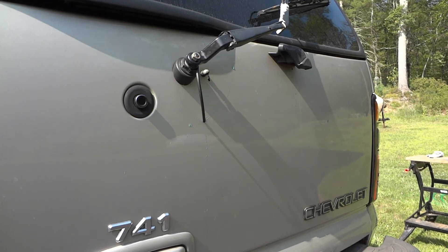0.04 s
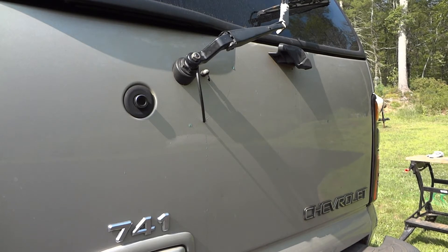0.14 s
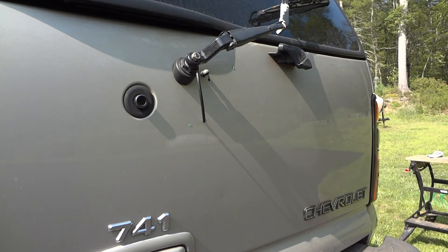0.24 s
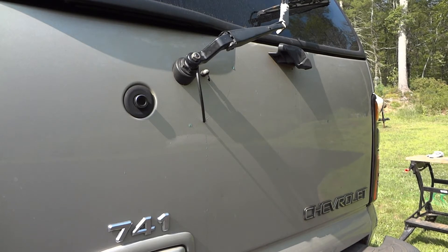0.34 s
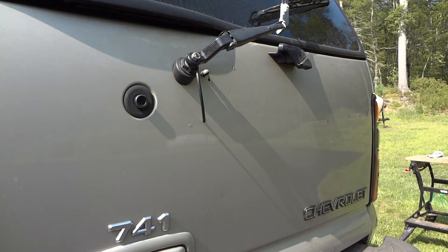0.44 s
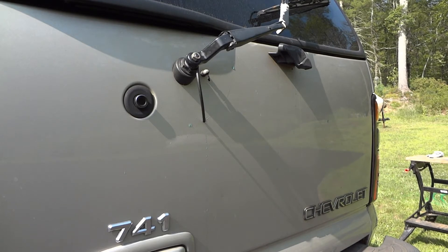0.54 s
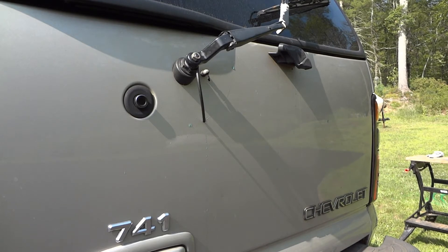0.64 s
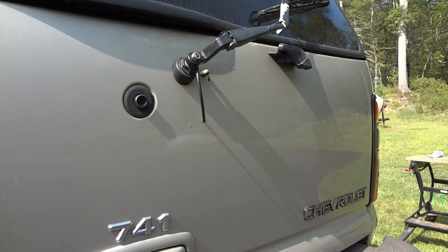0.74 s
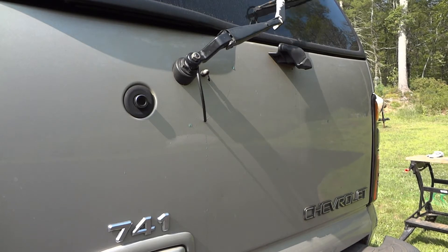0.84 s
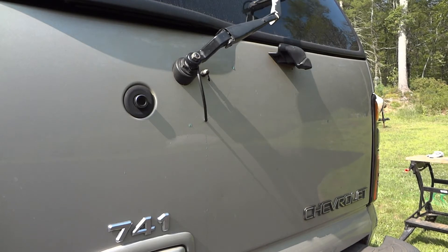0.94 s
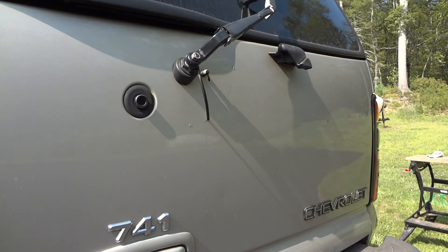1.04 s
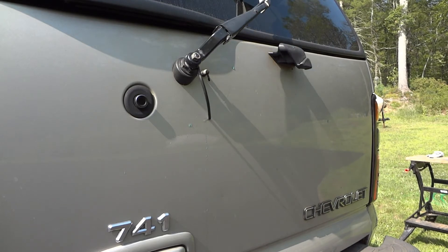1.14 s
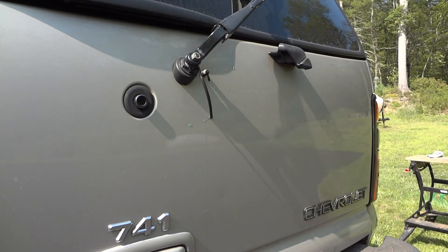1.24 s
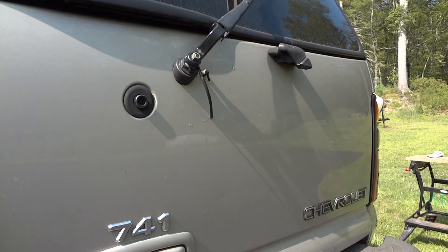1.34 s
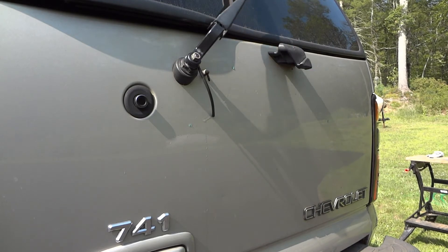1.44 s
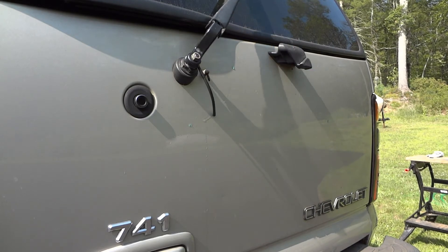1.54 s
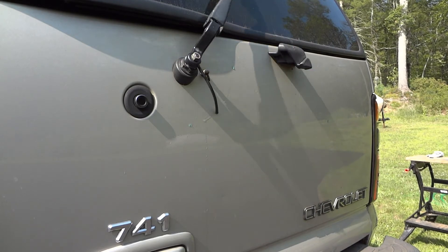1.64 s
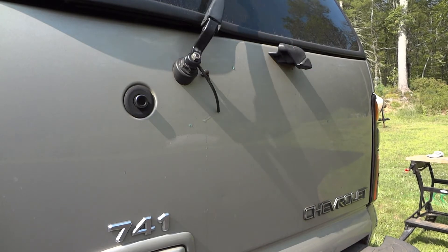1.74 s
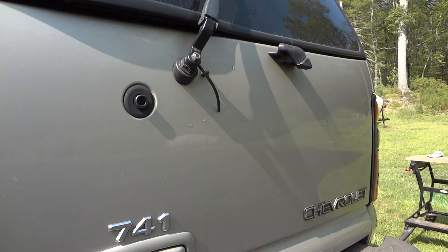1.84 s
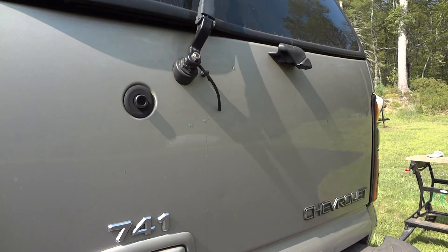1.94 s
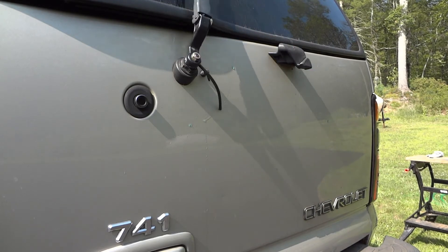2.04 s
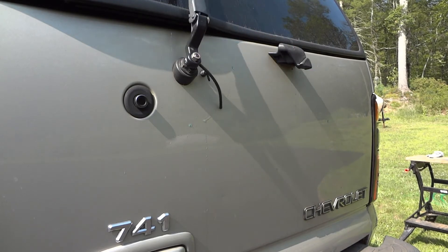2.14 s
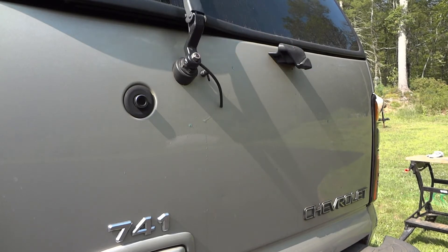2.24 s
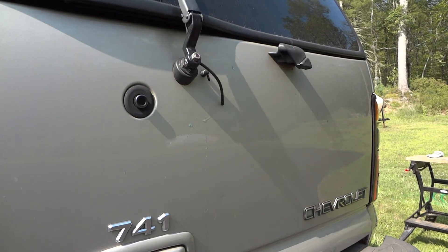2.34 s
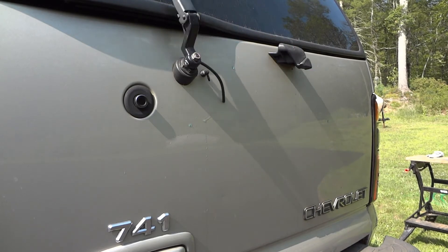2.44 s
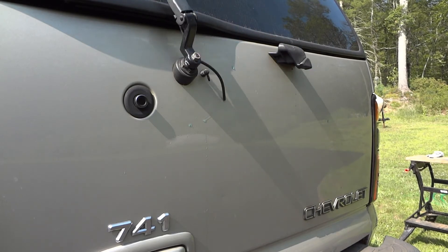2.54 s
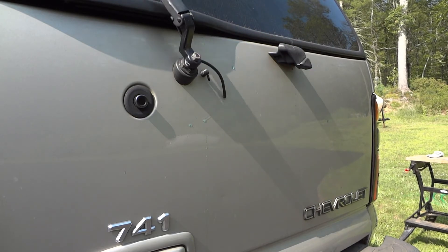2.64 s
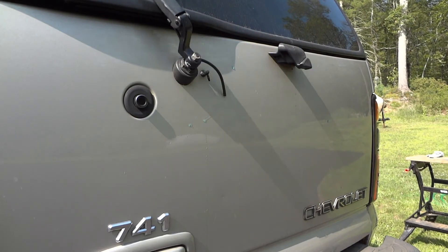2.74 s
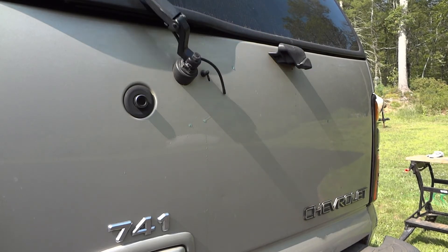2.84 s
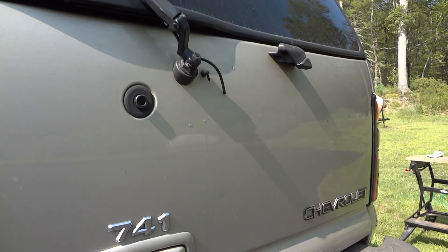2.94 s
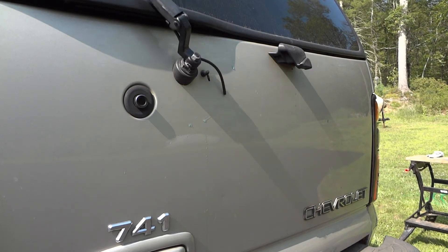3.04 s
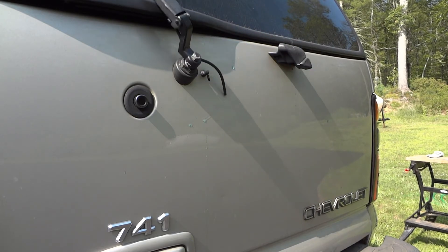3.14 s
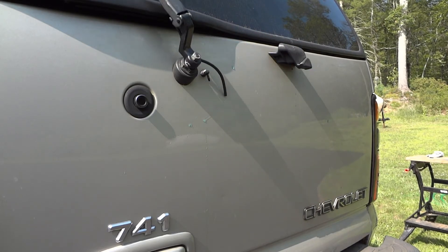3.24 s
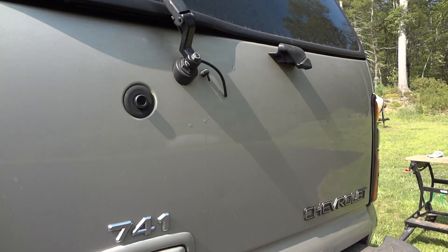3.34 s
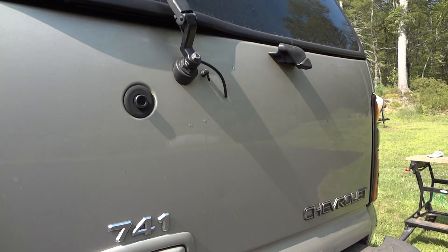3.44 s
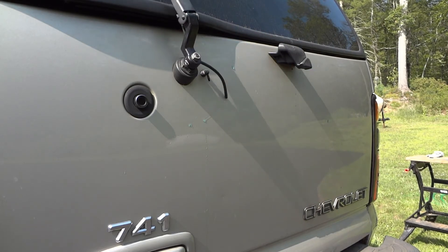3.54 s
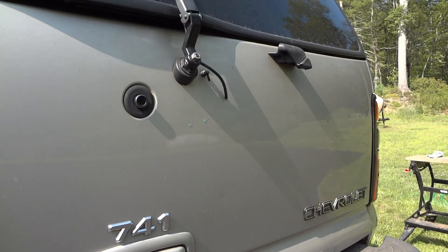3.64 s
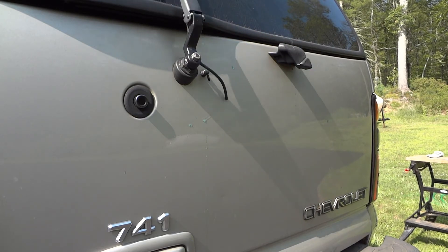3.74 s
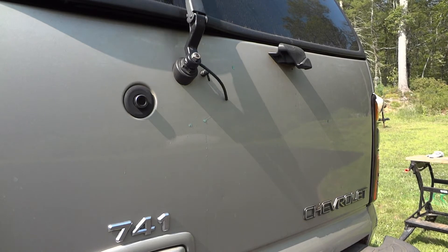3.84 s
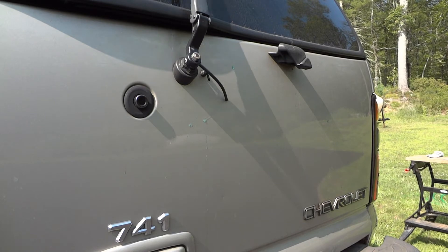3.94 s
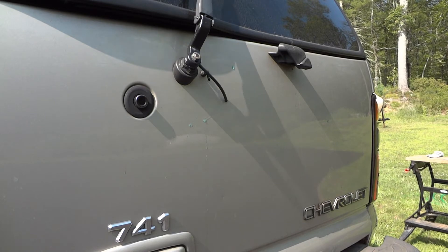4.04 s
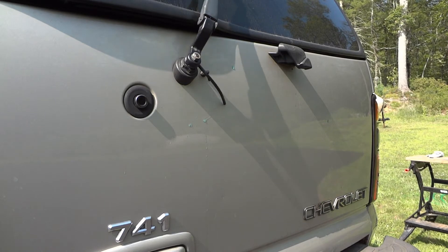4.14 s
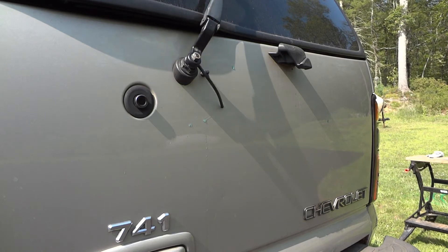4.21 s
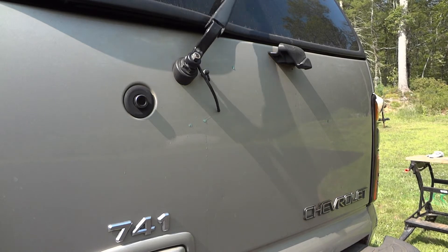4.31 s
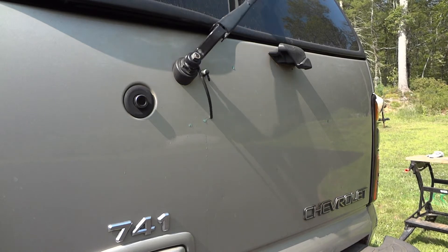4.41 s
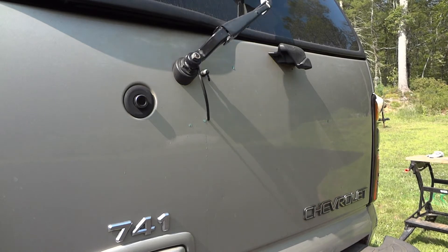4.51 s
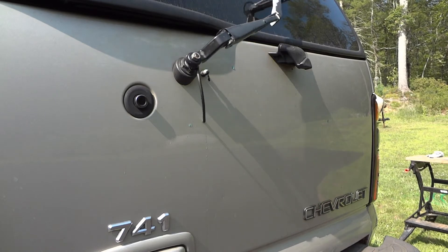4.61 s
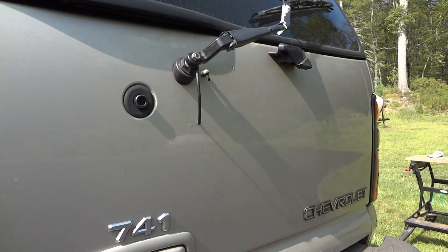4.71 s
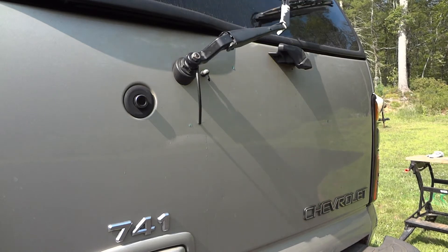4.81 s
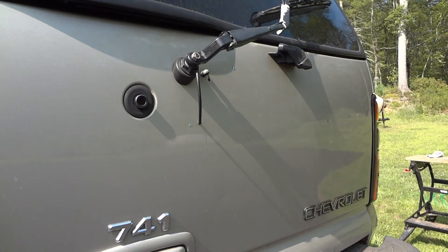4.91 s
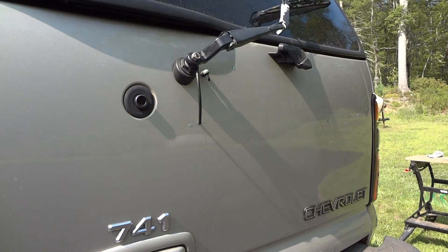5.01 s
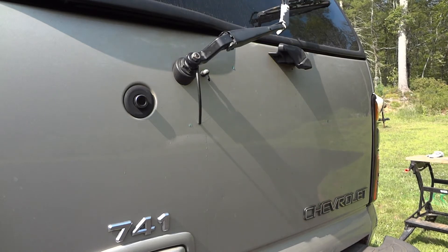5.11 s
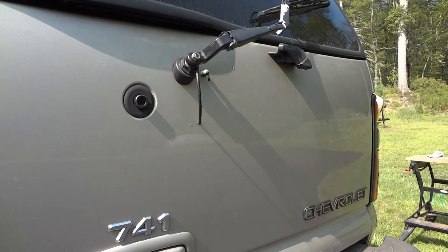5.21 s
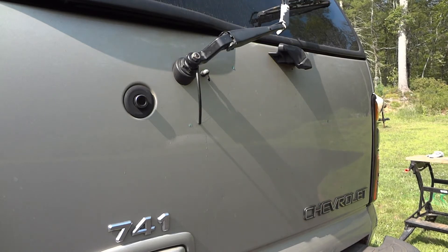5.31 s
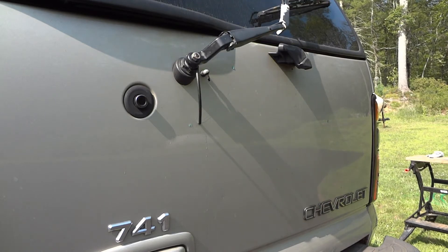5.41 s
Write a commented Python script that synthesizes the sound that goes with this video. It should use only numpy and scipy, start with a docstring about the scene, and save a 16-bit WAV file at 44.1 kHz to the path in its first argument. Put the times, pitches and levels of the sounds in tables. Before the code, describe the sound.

A single dry wiper stroke, miked close outdoors with faint microphone hiss. Quiet crickets and a thin, very high whistle come first; then bright rubber hiss builds, peaks and judders as the blade turns over, slightly to the left. The return stroke hisses softer, ending in a thin squeal, a bright snap, swelling motor hum, a pulsing whine and several clicks at rest.

```python
"""The rear wiper of a parked vehicle sweeps out and back once, on a lawn in summer.
A crank swings the arm; the rubber blade hisses over dry glass and stutters as it flips and as it parks.
The motor hums through the tailgate under load, the drive whines near the stop, and the linkage creaks,
shudders and clicks. These are tones, coloured noise and short ringing modes shaped by the arm's travel.
Crickets chirp and trill in the grass, with a faint drone and thin high whistles in the open air."""
import sys
import numpy as np
from scipy import signal
from scipy.fft import rfft, irfft, next_fast_len
from scipy.io import wavfile
from scipy.ndimage import map_coordinates

SR = 44100
rng = np.random.default_rng(int(sys.argv[2]) if len(sys.argv) > 2 else 0)


def store_pcm(level_fs):
    """Save levels as 16-bit WAV."""
    pcm = np.round(np.clip(level_fs, -1, 1) * 32767).astype(np.int16)
    wavfile.write(sys.argv[1], SR, np.atleast_2d(pcm).T)


N = 241055
TIME = np.arange(N) / SR
CUTOFF_HZ = 15880  # top of the sound


def from_db(db):
    """Decibels to gain."""
    return 10 ** (np.asarray(db) / 20)


def rms_one(x):
    """Scale to unit power."""
    return x / np.sqrt(np.mean(x ** 2) + 1e-20)


def in_time(rows):
    """Each column of a curve, read at every sample."""
    known_s, *columns = np.transpose(rows)
    return [np.interp(TIME, known_s, column) for column in columns]


def at_hz(points, hz):
    """Read a table on a log-frequency axis."""
    known_hz, values = np.transpose(points)
    return np.interp(np.log(hz + 1), np.log(known_hz), values)


def drift(rate_hz):
    """Slow random wander with spread 1: noise through two equal low-pass poles, at every 20th sample."""
    pole = np.exp(-40 * np.pi * rate_hz / SR)
    steps = rng.standard_normal(N // 20 + 4002)
    slow = signal.lfilter([1], [1, -2 * pole, pole * pole], steps)[4000:]  # drop the filter's start
    return np.interp(np.arange(N) / 20, np.arange(len(slow)), rms_one(slow))


def sine(hz):
    """A tone of rms 1 that follows a pitch curve from a random phase."""
    cycles = np.cumsum(hz * np.ones(N)) / SR
    return np.sqrt(2) * np.sin(2 * np.pi * (cycles + rng.random()))


def blurred_note(pitch_hz, width_hz):
    """Two neighbouring tones with randomly wandering strengths smear a note into a narrow band."""
    lower = drift(width_hz) * sine(pitch_hz)
    upper = drift(width_hz) * sine(pitch_hz + width_hz / 2)
    return lower + upper


def panned(x, pan_db):
    """Place a sound by its left minus right level."""
    return x * from_db(np.array([[.5], [-.5]]) * pan_db)


def noise(spectrum, likeness):
    """Stereo noise of a given colour and left-right likeness; rms 1."""
    size = next_fast_len(N)
    hz = np.arange(size // 2 + 1) * SR / size
    mid, side = rfft(rng.standard_normal((2, size)))
    alike = np.clip(at_hz(likeness, hz), -1, 1)
    both = np.sqrt(1 + alike) * mid + np.sqrt(1 - alike) * side * [[1], [-1]]
    # beyond the table's ends the colour falls away softly
    low_skirt = 1 + (spectrum[0][0] / (hz + 1)) ** 4
    high_skirt = 1 + (hz / spectrum[-1][0] / 2) ** 4
    skirts = 1 / np.sqrt(low_skirt * high_skirt)
    coloured = both * from_db(at_hz(spectrum, hz)) * skirts * (hz < CUTOFF_HZ)
    return rms_one(irfft(coloured, size)[:, :N])


def swells(rows):
    """Envelope of bell-shaped bursts from rows of centre_s, half_length_s, level_db; powers add."""
    power = 0
    for centre_s, half_s, level_db in rows:
        bell = np.exp(-np.minimum(((TIME - centre_s) / half_s) ** 2, 100))
        power = power + from_db(level_db) ** 2 * bell
    return np.sqrt(power)


def during(start_s, end_s, fade_s):
    """1 from start to end, fading outside."""
    return np.clip(1 + np.minimum(TIME - start_s, end_s - TIME) / fade_s, 0, 1)


def moving_resonance(x, centre_hz, width_hz, size=256):
    """A resonance of gain 1 whose centre glides, updated block by block."""
    radius = np.exp(-np.pi * width_hz / SR)
    zeros = np.array([1, 0, -1]) * (1 - radius * radius) / 2
    out, state = np.zeros_like(x), np.zeros((2, 2))
    for i in range(0, N, size):
        poles = [1, -2 * radius * np.cos(2 * np.pi * centre_hz[i] / SR), radius * radius]
        out[:, i:i + size], state = signal.lfilter(zeros, poles, x[:, i:i + size], zi=state)
    return out


# colour of the open air: pitch_hz, relative_db_per_hz
AIR = [(25, -13), (60, -11.5), (130, -4.5), (260, -1), (500, -2), (1000, -1.5), (2000, -7), (3500, -14),
       (6000, -17.5), (7900, -21), (9000, -24)]
# left-right likeness of the open air: pitch_hz, correlation
AIR_LIKENESS = [(60, 0.77), (130, 0.96), (290, 0.53), (640, -0.36), (1410, -0.39), (3100, -0.35),
                (6820, 0.28)]


def outdoors(air_db=-50.0, breeze_db=1.0):
    """Soft, wide open-air noise whose level drifts slowly."""
    return from_db(air_db + breeze_db * drift(1.2)) * noise(AIR, AIR_LIKENESS)


# thin whistles: pitch_hz, rms_db, waver_hz
THIN_TONES = [(12225, -72, 45), (13485, -61, 2)]


def thin_whistles():
    """Steady tones far up in the treble, each wavering slightly in pitch."""
    return sum(from_db(db) * sine(hz + waver_hz * drift(58)) for hz, db, waver_hz in THIN_TONES)


def trilling_cricket(pitch_hz, per_s, level_db, width_hz):
    """A farther insect beats its wings without pause; the grass blurs its note into a narrow band."""
    beat = np.cumsum(per_s * (1 + .03 * drift(4))) / SR % 1
    note = sine(pitch_hz) + blurred_note(pitch_hz, width_hz) / 2
    return from_db(level_db) * rms_one(np.sin(np.pi * beat) ** 2 * note)


# the low drone comes and goes in the distance: centre_s, half_length_s, level_db
DRONES = [(.08, 0.075, -57), (3.55, 0.22, -65.5)]


def drone(pitch_hz=240, unsteady=0.021):
    """A faint low note, wavering in pitch, that swells and fades."""
    return swells(DRONES) * sine(pitch_hz * (1 + unsteady * drift(36)))


# the arm's joints creak: start_s, level_db, ringing_hz
CREAKS = [(.15, -53, 650), (.87, -54, 510), (1.605, -50, 1200), (2.468, -44.5, 1430)]


def creaks(attack_s=0.0059, rasp_s=0.088, ring_s=0.034, ring_db=-1, unsteady=0.015, rasp_db=-2):
    """A joint gives way: a dying rasp around one brief, unsteady note."""
    out = 0
    for start_s, level_db, hz in CREAKS:
        age = np.maximum(TIME - start_s, 0)
        band = signal.butter(2, [hz / 1.6, hz * 1.64], "band", fs=SR, output="sos")
        rough = rms_one(signal.sosfilt(band, rng.standard_normal(N)))
        rasp = from_db(rasp_db) * np.exp(-age / rasp_s) * rough
        note = from_db(ring_db) * np.exp(-age / ring_s) * sine(hz * (1 + unsteady * drift(114)))
        out = out + from_db(level_db) * np.minimum(age / attack_s, 1) * (note + rasp)
    return out


# chirps of the nearest cricket: first_pulse_s, level_db (before the trim)
CHIRPS = [(0.236, -50), (0.549, -46.5), (0.879, -46), (1.184, -45), (1.520, -41), (1.805, -43),
          (2.098, -43), (2.447, -43), (4.676, -45.5), (5.034, -48), (5.272, -45.5)]
# the pulses of one chirp in order: relative_db
CHIRP_PULSES_DB = [-2, 2.5, 3.5]


def chirping_cricket(pitch_hz=4810, fall_hz=100, pulse_gap_s=0.036, half_s=0.0062, trim_db=-2,
                     waver_hz=35, uneven_db=1, pan_db=-5.5):
    """Each closing of the wings gives a short note that sags in pitch; three make a chirp."""
    pulses = []
    for start_s, level_db in CHIRPS:
        for k, pulse_db in enumerate(CHIRP_PULSES_DB):
            uneven = uneven_db * rng.standard_normal()
            pulses.append((start_s + k * pulse_gap_s, half_s, level_db + pulse_db + uneven))
    centres = np.array(pulses)[:, 0]
    nearest = centres[np.searchsorted((centres[1:] + centres[:-1]) / 2, TIME)]
    sag = np.clip((TIME - nearest) / half_s / 2, -1, 1)
    note = sine(pitch_hz - fall_hz * sag + waver_hz * drift(118))
    return panned(from_db(trim_db) * swells(pulses) * note, pan_db)


# the crank's one turn: the arm leaves its rest, reaches the far end, is back
LEAVE_S, FAR_S, HOME_S = 0.613, 3.0, 5.05


def crank():
    """The arm's travel (0 at rest, 1 at the far end), slowest at both ends."""
    angle = np.pi * np.interp(TIME, [LEAVE_S, FAR_S, HOME_S], [0, 1, 2])
    return (1 - np.cos(angle)) / 2


# the motor takes up load: start_s, full_load_s, end_s (may cut the rise short), full_load_db
LOADS = [(.9, 1.586, 1.654, -54.5), (2.567, 3.0, 2.78, -59), (4.16, 4.89, 5.06, -41)]
# the hum slows with the arm far out; it swells from idle and eases after full load
MOTOR_HZ, MOTOR_SAG_HZ, IDLE_DB, EASE_DB_PER_S = 188.7, 10.5, -59, 39


def motor(pitch_wobble=0.0083, throb_db=1.2, rough=0.38, rough_per_s=20, octave_db=-26, pan_db=2):
    """The geared motor's rough hum swells and throbs each time the load builds."""
    travel = crank()
    pitch_hz = (MOTOR_HZ - MOTOR_SAG_HZ * travel ** 2) * (1 + pitch_wobble * drift(20))
    level = 0
    for start_s, full_s, end_s, full_db in LOADS:
        load = np.sin(np.pi / 2 * np.interp(TIME, [start_s, full_s], [0, 1]))
        eased_db = EASE_DB_PER_S * np.maximum(TIME - full_s, 0)
        level_db = IDLE_DB + (full_db - IDLE_DB) * load - eased_db
        level = level + during(start_s, end_s, fade_s=.025) * from_db(level_db)
    tone = sine(pitch_hz) + from_db(octave_db) * sine(2 * pitch_hz)
    roughness = drift(rough_per_s) * sine(pitch_hz) + drift(rough_per_s) * sine(pitch_hz)
    hum = rms_one(tone + rough * roughness)
    return panned(level * from_db(throb_db * drift(33)) * hum, pan_db)


def dust_ticks(per_s, size_db):
    """Now and then a speck of grit snaps under the rubber: random impulses in a treble band."""
    snaps = (rng.random(N) < per_s / SR) * rng.exponential(1, N).clip(0, 2)
    band = signal.butter(6, [5000, 14000], "band", fs=SR, output="sos")
    return from_db(size_db) * signal.sosfilt(band, snaps + 1e-18)


# glass reflection: spacing of its hollows at rest and their fall over the sweep
HOLLOWS_HZ, HOLLOWS_FALL_HZ, HOLLOW_WIDTH_HZ = 5830, 1360, 1130


def off_the_glass(x, reflects, depth, lean_hz, travel):
    """A late copy cuts evenly spaced hollows, the second deepest; they fill in as the arm swings away."""
    spacing_hz = HOLLOWS_HZ - HOLLOWS_FALL_HZ * travel + lean_hz
    arrival = np.arange(N) - SR / spacing_hz
    late = np.array([map_coordinates(channel, [arrival], order=3) for channel in x])
    near = 1 - travel ** 3
    x = (x - reflects * near * late) / np.sqrt(1 + (reflects * near) ** 2)
    return x - depth * near * moving_resonance(x, 2 * spacing_hz, HOLLOW_WIDTH_HZ)


# the blade's two strokes: time_s, rubbing_db, treble_db (relative, before the sheen trim), lip_resonance_hz
STROKE_OUT = [(0.92, -58.5, -1, 7530), (1.18, -58.5, 5, 7400), (1.25, -46, -1, 6940),
              (1.38, -47, 5.5, 8700), (1.9, -46, -4.5, 7630), (2.04, -45.5, -0.5, 6750),
              (2.5, -29.5, -1, 8200), (2.58, -26, -6, 7130), (2.95, -16.5, -8, 7280)]
STROKE_BACK = [(3.08, -23.5, -10, 7000), (3.176, -21, -7, 7550), (3.494, -23.5, -4.5, 8360),
               (3.75, -24.5, -4, 7020), (4.088, -32.5, -1.5, 6850), (4.316, -33.5, -1, 7620),
               (4.442, -36, -3, 7100), (4.49, -37.5, -10, 6800), (4.54, -38.5, -7, 7780)]
# slips of the rubber as it sets off, flips over and parks: centre_s, half_length_s, level_db
SLIPS = [(1.09, 0.0073, -55), (2.92, 0.032, -31), (2.954, 0.0074, -21.5), (2.965, 0.0047, -21.5),
         (2.983, .009, -25.5), (2.997, 0.0057, -22.5), (3.024, 0.0068, -27), (3.038, 0.0089, -35),
         (3.073, 0.0048, -27.5), (4.548, 0.0085, -41.5), (4.586, 0.015, -38), (4.644, 0.022, -40),
         (4.74, 0.086, -53)]
# colours of the rubbing, its treble sheen and its low scrape: pitch_hz, relative_db_per_hz
RUB = [(3000, -27), (4200, -10.5), (5300, -2), (6700, 1), (8500, -1), (10200, -1.5), (11500, -4.5),
       (15000, -39)]
SHEEN = [(9800, -15), (11500, -3.5), (12800, 0), (14000, -1), (15000, -5.5), (16000, -10)]
SCRAPE = [(600, -11), (1200, -2), (2200, -14), (2900, -1.5), (3700, -3.5), (4600, -5.5), (5600, 8.5),
          (7500, -27)]
# left-right likeness of the blade and tailgate: pitch_hz, correlation
WIPER_LIKENESS = [(150, 1), (400, 0.63), (1000, 0.67), (2200, 1), (3300, 0.91), (5500, 0.98), (15000, .999)]
# strength of the reflection and depth of its second hollow on each stroke (0-1)
REFLECTS_OUT, REFLECTS_BACK, DEPTH_OUT, DEPTH_BACK = 0.29, 0.076, 0.11, 0.22
LEAN_HZ = 100  # the blade leans behind its motion, which shifts the hollows
LIP_WIDTH_HZ, LIP_DB = 3200, 2  # the lip's resonance, relative to the rubbing
# the scrape follows a share of the rubbing's swing about a usual level
USUAL_RUB_DB, SCRAPE_DB, SCRAPE_FOLLOWS = -30, -49, 0.39
UPRIGHT_DB, UPRIGHT_S = 8, 0.2  # the scrape grows while the blade stands upright at the far end
REST_PAN_DB, FAR_PAN_DB = -0.6, 3.5  # left minus right: the blade travels to the left


def blade(rub_db=0.2, sheen_db=-1.2, grain_db=0.65, judder_db=0.7, slip_sheen_db=-8, slip_scrape_db=-15,
          pan_curve=2.9):
    """Countless tiny slips of rubber on glass, coloured by the lip; the grip is uneven and the arm judders."""
    travel = crank()
    rub, sheen, scrape = (noise(colour, WIPER_LIKENESS) for colour in (RUB, SHEEN, SCRAPE))
    grit = dust_ticks(per_s=55, size_db=12)
    upright = np.exp(-np.abs(TIME - FAR_S) / UPRIGHT_S)
    slip_colour = rub + from_db(slip_sheen_db) * sheen + from_db(slip_scrape_db) * scrape
    out = swells(SLIPS) * slip_colour
    strokes = ((STROKE_OUT, REFLECTS_OUT, DEPTH_OUT, LEAN_HZ),
               (STROKE_BACK, REFLECTS_BACK, DEPTH_BACK, -LEAN_HZ))
    for stroke, reflects, depth, lean_hz in strokes:
        level_db, treble_db, lip_hz = in_time(stroke)
        lip = rms_one(rub + from_db(LIP_DB) * moving_resonance(rub, lip_hz, LIP_WIDTH_HZ))
        treble = from_db(treble_db + sheen_db) * sheen
        hiss = from_db(level_db) * (from_db(rub_db) * lip + treble + grit)
        scrape_db = SCRAPE_DB + SCRAPE_FOLLOWS * (level_db - USUAL_RUB_DB) + UPRIGHT_DB * upright
        reflected = off_the_glass(hiss + from_db(scrape_db) * scrape, reflects, depth, lean_hz, travel)
        out = out + during(stroke[0][0], stroke[-1][0], fade_s=0.0041) * reflected
    grip = from_db(grain_db * drift(265) + judder_db * drift(23))
    pan_db = REST_PAN_DB + (FAR_PAN_DB - REST_PAN_DB) * travel ** pan_curve
    return panned(out * grip, pan_db)


# clicks of the arm and its joints: start_s, level_db, brightest_hz
CLICKS = [(1.583, -51, 7500), (2.466, -42, 3000), (4.374, -33, 2030), (4.651, -17, 12500),
          (4.865, -27, 11940), (4.932, -24.5, 4660), (5.011, -27, 5500), (5.090, -30, 12500)]
# modes of the arm: pitch_hz, relative_db, t60_s
ARM = [(1390, 0.5, 0.015), (2330, 3, 0.0092), (3520, -41, .012), (4780, 2.5, 0.027), (5260, -3, 0.022),
       (5830, -1, 0.011), (6560, -8, .02), (8100, -10, .03), (9700, -20, 0.027), (11800, -22, .02),
       (12600, -13, .015), (14400, -1, .012)]


def clicks(focus_db_per_octave=9, ring_db=-7, crack_db=-13, crack_s=0.0024, pan_db=1):
    """Each knock of a joint is a short crack that rings the arm, mostly near one pitch."""
    out, t = np.zeros(N), TIME[:SR // 10]
    hz, mode_db, t60 = np.transpose(ARM)[:, :, None]
    for start_s, level_db, bright_hz in CLICKS:
        off_focus_db = focus_db_per_octave * np.abs(np.log2(hz / bright_hz))
        strength = from_db(mode_db + ring_db - off_focus_db) * rng.choice([-1, 1], hz.shape)
        rings = np.sum(strength * from_db(-60 * t / t60) * np.sin(2 * np.pi * hz * t), axis=0)
        edges_hz = [bright_hz / 2, min(bright_hz * 2, CUTOFF_HZ)]
        band = signal.butter(2, edges_hz, "band", fs=SR, output="sos")
        crack = signal.sosfilt(band, rng.standard_normal(len(t)) * np.exp(-t / crack_s))
        start = round(start_s * SR)
        out[start:start + len(t)] += from_db(level_db) * (rings + from_db(crack_db) * crack)
    return panned(out, pan_db)


# the rubber flops over at the far end: centre_s, half_length_s, level_db
FLOP = [(2.985, 0.042, -44)]
# its dull body: pitch_hz, relative_db_per_hz
FLOP_BODY = [(200, -5.5), (380, 2), (600, -3), (1000, -9), (1700, -22)]


def rubber_flop(pan_db=2.5):
    """The rubber turning over gives one dull swell of low noise."""
    return panned(swells(FLOP) * noise(FLOP_BODY, WIPER_LIKENESS), pan_db)


# the linkage shudders against the tailgate: centre_s, half_length_s, level_db
SHUDDERS = [(2.992, .022, -38), (3.053, 0.063, -46), (4.585, 0.026, -42), (4.67, 0.017, -34.5),
            (4.75, 0.032, -46), (4.858, 0.028, -39.5), (4.92, 0.037, -42.5), (5.033, 0.022, -46.5)]
# rumble of the tailgate, and the whole gate heaving: pitch_hz, relative_db_per_hz
TAILGATE = [(70, -20), (105, -10), (138, 1.5), (200, 5), (280, -15), (460, -8.5), (700, -15.5),
            (1050, -15.5), (1600, -46), (3500, -29)]
BODY_BOOM = [(30, -11), (60, 0), (90, 5), (130, -17), (250, -24)]


def tailgate(boom_db=-17, far_loss_db=3, pan_db=2.5):
    """Each shudder of the linkage makes the panel rumble; near the arm's rest the whole gate heaves too."""
    travel = crank()
    rumble = noise(TAILGATE, WIPER_LIKENESS)
    boom = (1 - travel) * from_db(boom_db) * noise(BODY_BOOM, WIPER_LIKENESS)
    return panned(swells(SHUDDERS) * from_db(-far_loss_db * travel) * (rumble + boom), pan_db)


# the blade squeals on the last of the glass: start_s, end_s
SQUEAL = (4.39, 4.68)


def squeal(pitch_hz=2615, level_db=-63, width_hz=70):
    """The rubber sings one thin, broken note as it slows."""
    note = rms_one(blurred_note(pitch_hz, width_hz))
    return during(*SQUEAL, fade_s=.02) * from_db(level_db) * note


# the drive whines as it nears the stop: start_s, end_s
WHINE = (4.72, 5.04)


def drive_whine(pitch_hz=5790, level_db=-53.98, rise_db_per_s=12, per_s=31, dip=0.59, octave_db=-10):
    """A thin note that grows toward the stop and pulses once for each turn of the motor shaft."""
    from_stop = np.minimum(TIME - WHINE[1], 0)
    turn = 1 - dip * (1 + np.cos(2 * np.pi * per_s * from_stop))
    hz = pitch_hz + 10 * drift(100)
    level = during(*WHINE, fade_s=.008) * from_db(level_db + rise_db_per_s * from_stop)
    return level * turn * (sine(hz) + from_db(octave_db) * sine(2 * hz))


def scene(insects_pan_db=-5.5):
    """The wiper close by, insects and air behind it."""
    trills = trilling_cricket(pitch_hz=4716, per_s=76, level_db=-60.5, width_hz=130)
    trills += trilling_cricket(pitch_hz=4920, per_s=32, level_db=-63.5, width_hz=370)
    trills += trilling_cricket(pitch_hz=7830, per_s=17, level_db=-70.0, width_hz=510)
    trills += trilling_cricket(pitch_hz=8200, per_s=13, level_db=-73.5, width_hz=1400)
    insects = panned(trills, insects_pan_db) + chirping_cricket()
    background = outdoors() + thin_whistles() + drone()
    drive = creaks() + motor() + clicks() + tailgate() + drive_whine()
    rubber = blade() + rubber_flop() + squeal()
    return background + insects + drive + rubber


MIC_HISS_DB = -59.5  # rms, before the top is cut
PEAK_LIMIT = 1.15  # amplitude the rounded peaks approach


def record(dry):
    """A faint even hiss is added and the highest peaks are rounded softly; the top is cut steeply."""
    hiss = from_db(MIC_HISS_DB) * rng.standard_normal(N)
    rounded = PEAK_LIMIT * np.tanh((dry + hiss) / PEAK_LIMIT)
    top_cut = signal.ellip(12, .1, 80, CUTOFF_HZ, fs=SR, output="sos")
    return signal.sosfilt(top_cut, rounded)


dry = scene()
out = record(dry)
store_pcm(out)
```